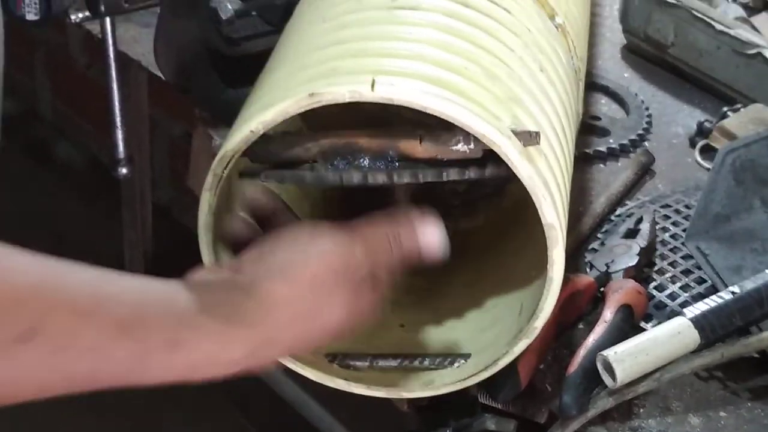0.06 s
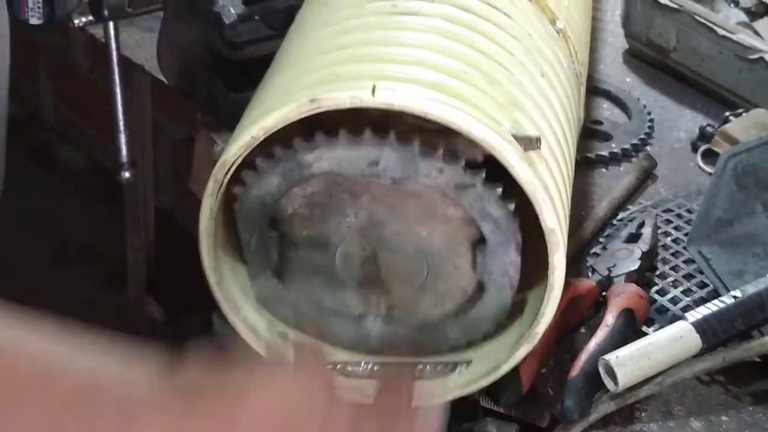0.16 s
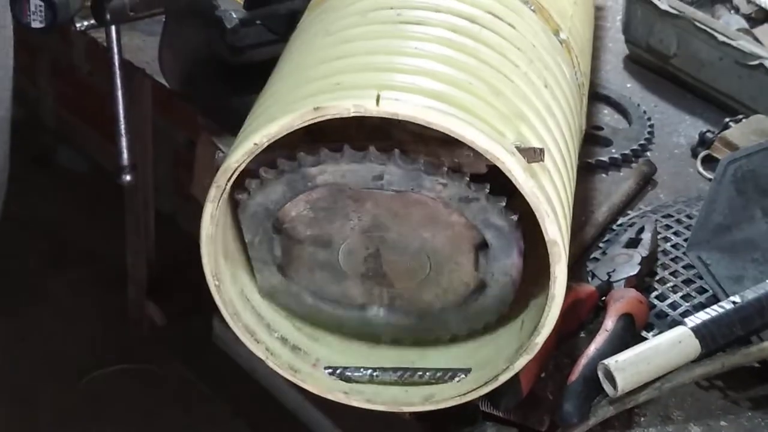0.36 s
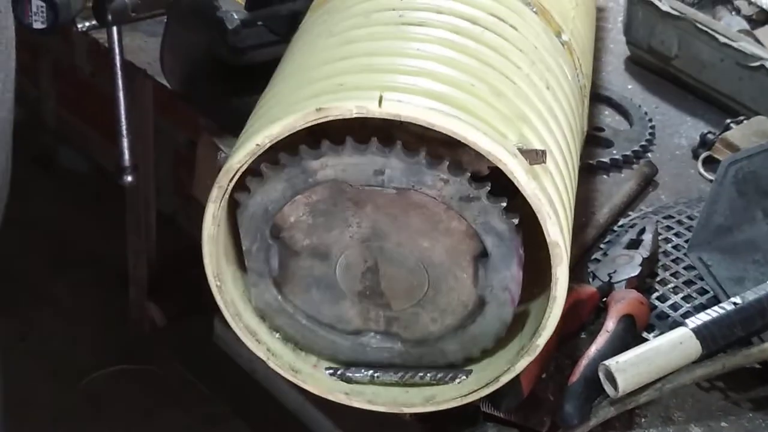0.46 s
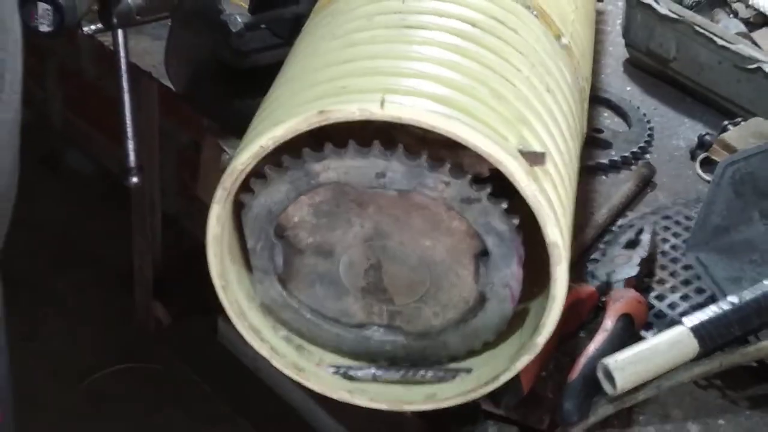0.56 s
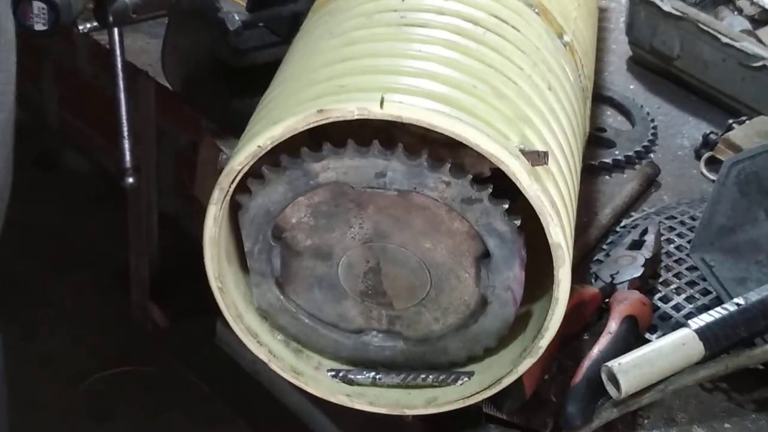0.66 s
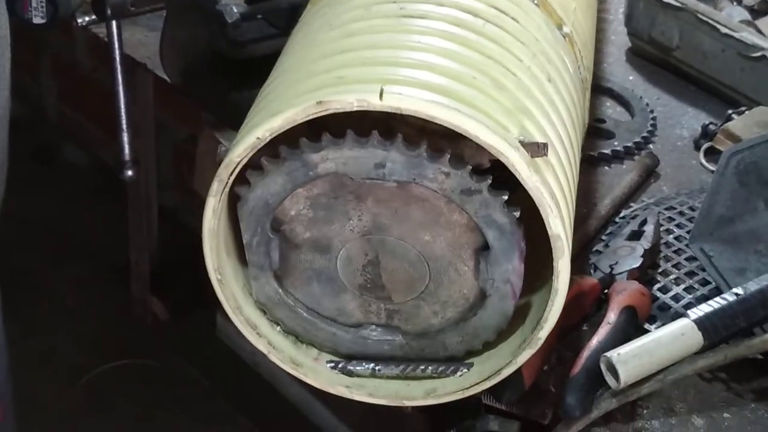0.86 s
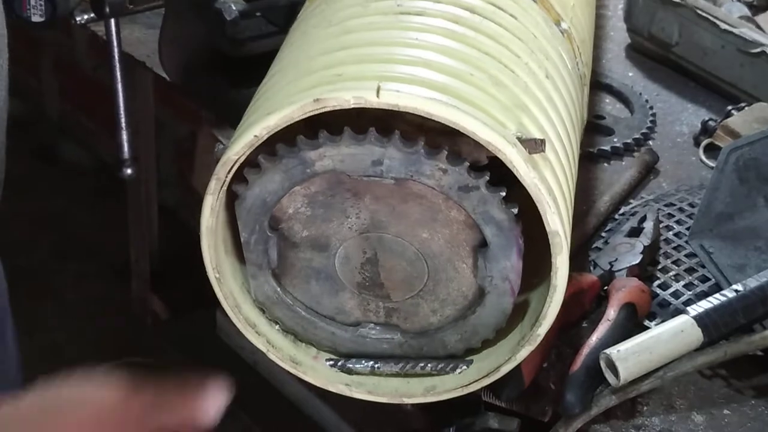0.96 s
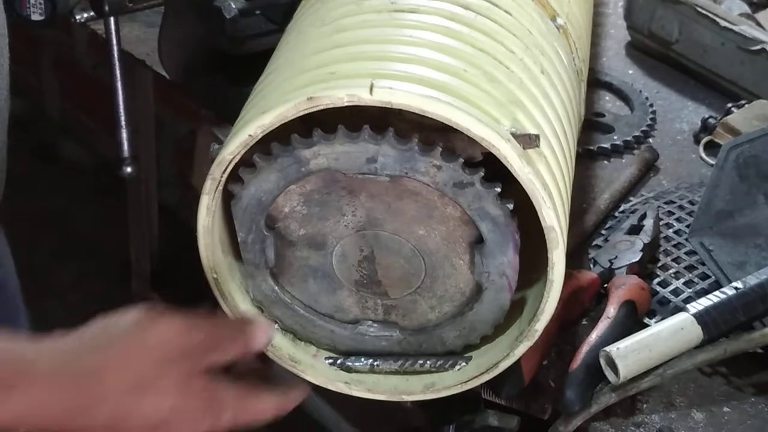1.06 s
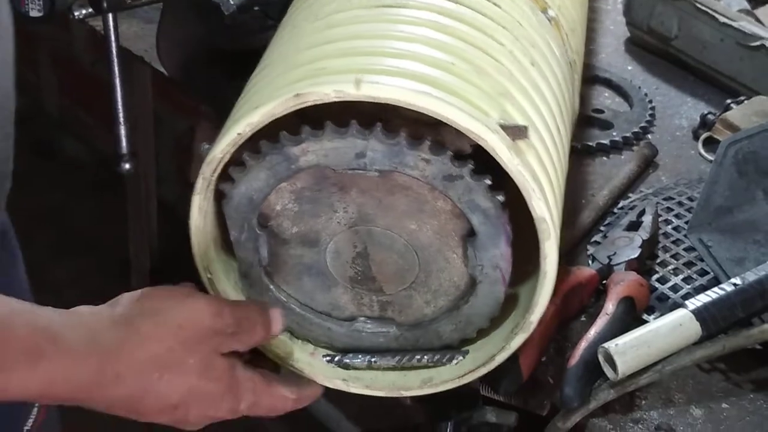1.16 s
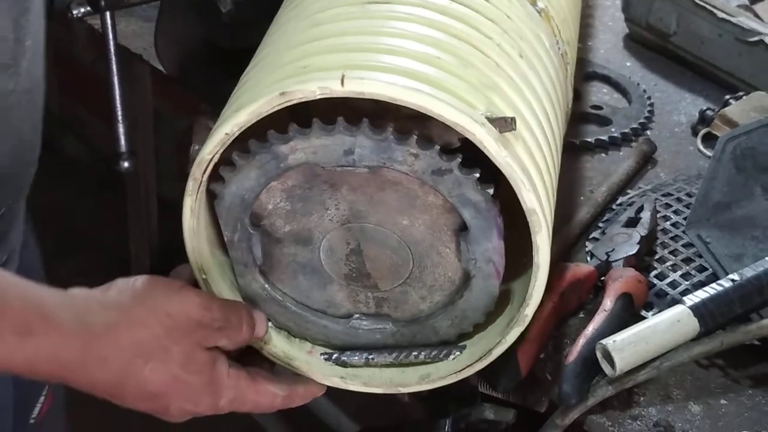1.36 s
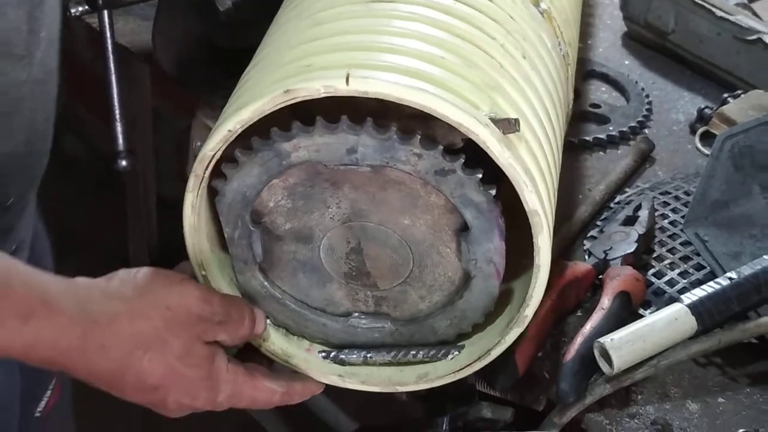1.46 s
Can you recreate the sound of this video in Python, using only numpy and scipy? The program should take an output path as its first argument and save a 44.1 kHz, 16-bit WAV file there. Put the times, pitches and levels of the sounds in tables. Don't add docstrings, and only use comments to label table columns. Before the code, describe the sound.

A heavy steel flap in a plastic pipe is released by hand, slams with a loud bright clank, bounces twice more quietly, then cloth rustles and a hand softly thumps the pipe; close stereo, small workshop.

```python
import sys
import numpy as np
from scipy import signal
from scipy.fft import rfft, irfft, next_fast_len
from scipy.io import wavfile
from scipy.ndimage import map_coordinates

SR = 44100
rng = np.random.default_rng(int(sys.argv[2]) if len(sys.argv) > 2 else 0)


def volts(x):
    e = np.asarray(x, float) / 20
    return 10 ** e


def to_wav(s):
    ch = np.atleast_2d(s).T
    pcm = np.round(np.clip(ch, -1, 1) * 32767)
    wavfile.write(sys.argv[1], SR, pcm.astype(np.int16))


N = 66150
ATTACK_S = 0.00035

# (frequency [Hz], likeness [0-1])
WIDE = [(200, 1), (600, .6), (2000, 0.13), (8000, 0.9)]


def unit(x):
    return x / np.sqrt(np.mean(x ** 2) + 1e-20)


def along(points, hz):
    f, v = np.transpose(points)
    return np.interp(np.log(hz + 1), np.log(f + 1), v)


def filtered(x, response):
    n = x.shape[-1]
    m = next_fast_len(n + 8192)
    return irfft(rfft(x, m) * response(np.fft.rfftfreq(m, 1 / SR)), m)[..., :n]


def rush(n, spectrum, alike):
    def mid_side(hz):
        turn = np.arccos(np.clip(along(alike, hz), -1, 1)) / 2
        return volts(along(spectrum, hz)) * np.array([np.cos(turn), np.sin(turn)])

    mid, side = filtered(rng.standard_normal((2, n)), mid_side)
    return unit(np.array([mid + side, mid - side]))


def wobble(rate):
    knots = rng.standard_normal(int(N * rate / SR) + 4)
    return map_coordinates(knots, [np.arange(N) * rate / SR])


def ring(modes, t, attack, cycles=0):
    phase_scatter = .4
    out, ears = 0, np.array([[1], [-1]])
    for hz, db, t60 in modes:
        level_db, turn = rng.normal(0, 1, 2) * (1 - along(WIDE, hz))
        rise = 1 - np.exp(-t / (attack + cycles / hz))
        fall = volts(db + 2 * level_db * ears - 60 * t / t60)
        out = out + rise * fall * np.sin(2 * np.pi * hz * t + phase_scatter * turn * ears)
    return out


def rustle(curve, spectrum, rough_db, alike):
    s, db = np.transpose(curve)
    times = np.r_[s[0] - .08, s, s[-1] + .06]
    level = np.interp(np.arange(N) / SR, times, np.r_[-95, db, -95])
    flutter = rough_db * (wobble(57) + wobble(380))
    return volts(level + flutter) * rush(N, spectrum, [(300, alike)])


def room_tone():
    # (frequency [Hz], level [dB per Hz])
    air = [(15, -1.5), (80, 0), (110, -6), (400, -12), (1500, -19), (4500, -28.5), (8000, -27.5),
           (13000, -44)]
    return volts(-60.5) * rush(N, air, [(80, 0.15), (200, 0.3), (1000, 0.1), (8000, 0.12)])


def hand():
    # (time [s], level [dB])
    palm = [
        (0.0, -55.5),
        (0.06, -62.5),
        (0.084, -74),
        (0.14, -52),
        (0.182, -63),
        (0.184, -45),
    ]
    # (frequency [Hz], level [dB per Hz])
    skin = [(80, -32.5), (150, -4.5), (400, -10), (1200, -15.5), (2800, -21.5), (4000, -33), (8000, -46),
            (14000, -47)]
    return rustle(palm, skin, rough_db=1.5, alike=1.0)


def grit():
    out, t = np.zeros((2, N + SR)), np.arange(SR // 2) / SR
    # (time [s], frequency [Hz], level [dB])
    ticks = [
        (.045, 11000, -67),
        (.07, 7630, -59),
        (1.237, 7720, -54),
    ]
    for s, hz, db in ticks:
        out[:, round(s * SR):][:, :len(t)] += ring([(hz, db, .02)], t, attack=0.0002)
    return out[:, :N]


def full_face(t):
    rattle_db, rattle_s = -1.5, .0058
    # (frequency [Hz], level [dB], t60 [s])
    face_modes = [(135, -27, .1), (187, -36, .5), (240, -20, .1), (308, -25, .12), (482, -9, .07),
                  (550, -19, .12), (1110, -10, .06), (1196, -8, .1), (1290, -11, .07), (1960, -8, .05),
                  (2380, -9, .045), (6600, -8, .035), (8000, -6, .022), (8380, -2, .03)]
    face = ring(face_modes, t, ATTACK_S, 1)
    again = ring(face_modes[-5:], t, ATTACK_S)
    again = np.pad(again, ((0, 0), (round(rattle_s * SR), 0)))[:, :len(t)]
    return face + volts(rattle_db) * again


def edge(t, light):
    # (frequency [Hz], level [dB], t60 [s])
    bounce_modes = [(680, -18, .13), (770, -16, .12), (1142, -4, .09), (1262, -8, .06), (1570, -4, .08),
                    (1994, -7, .06), (2486, -13, .04), (3930, -10, .025), (5540, -19, .15),
                    (5830, -6, .022), (6130, -6, .025), (6900, -9, .03), (9570, -8, .025),
                    (11060, -8, .022)]
    # (frequency [Hz], level [dB], t60 [s])
    tap_modes = [(663, -17, .2), (1096, -13, .05), (1146, -11, .08), (1434, -14, .12), (1570, -7, .09),
                 (1980, -9, .04), (2312, -17, .09), (3930, -10, .025), (5100, -15, .14), (6700, -12, .04),
                 (7000, -12, .06), (9780, -15, .05), (10575, -11, .07)]
    return ring(tap_modes if light else bounce_modes, t, ATTACK_S, cycles=3)


def clatter(t, share):
    crack_db, crack_t60_s = -11, .03
    clatter_db, clatter_t60_s = -15.5, 0.13
    edge_db = -1.5
    # (frequency [Hz], level [dB per Hz])
    face_spectrum = [(90, -42.5), (300, -5.5), (850, -14.5), (1200, -14), (2400, -5.5), (4500, -16),
                     (7000, -7.5), (14000, -23)]
    # (frequency [Hz], level [dB per Hz])
    edge_spectrum = [(120, -40.5), (250, -15), (520, -24), (900, -10), (3000, -14.5), (6200, -15.5),
                     (11000, -15.5), (13500, -26.5)]
    dense = share * rush(len(t), face_spectrum, WIDE)
    dense = dense + (1 - share) * volts(edge_db) * rush(len(t), edge_spectrum, WIDE)
    fall = volts(crack_db - 60 * t / crack_t60_s) + volts(clatter_db - 60 * t / clatter_t60_s)
    return dense * fall * (1 - np.exp(-t / ATTACK_S))


def linger(t, share, until_next):
    pressed = 0.68
    swell_s, catch_s = .025, .012
    # (frequency [Hz], level [dB], t60 [s])
    free_modes = [(393, -30, 1.4), (415, -40, .3), (700, -35, .4), (1136, -28, .6), (1195, -28, .3),
                  (1630, -32, .28), (6520, -34, .25)]
    held = [(hz, db, t60 * (1 - pressed * share)) for hz, db, t60 in free_modes]
    return ring(held, t, swell_s) * np.exp(-np.clip(t - until_next, 0, None) / catch_s)


def shop(x):
    delay_s = .006
    # (frequency [Hz], t60 [s])
    decay = [(150, .4), (500, 0.41), (2000, .3), (6000, 0.28), (13000, .22)]
    hz, t, z = signal.stft(rush(x.shape[1], [(100, 0)], WIDE), SR, nperseg=256)
    tail = signal.istft(z * volts(-60 * t / along(decay, hz)[:, None]), SR, nperseg=256)[1]
    tail = np.pad(tail, ((0, 0), (round(delay_s * SR), 0))) / np.linalg.norm(tail[0])
    return signal.fftconvolve(x[:1], tail, axes=1)[:, :x.shape[1]]


def off_axis(x):
    # (frequency [Hz], left over right [dB])
    port_db = [(180, 4.5), (1000, -2.5), (2500, 2.5), (5000, 2), (9000, 3.5), (13000, 2)]
    # (frequency [Hz], left leads by [rad])
    port_turn = [(200, 0.04), (1000, 0.2), (3000, 1.3), (5000, 1.8), (9000, 0.79), (13000, 0.99)]
    ears = np.array([[.5], [-.5]])
    return filtered(x, lambda f: volts(ears * along(port_db, f)) * np.exp(1j * ears * along(port_turn, f)))


def flap():
    modes_db, room_db = -6, -3.5
    low_hz, light_db = 140, -25
    # (time [s], peak [dB], full-face share [0-1], lingering ring [dB], brightness limit [Hz])
    hits = [
        (.188, -31, 0, -4, 7200),
        (.247, 3.5, 1, -5.5, 13780),
        (.553, -10.5, 0.25, -6, 12200),
        (.836, -26, 0.23, -10, 11100),
        (1.363, -37.5, 0.44, -4, 6700),
    ]
    out, t = np.zeros((2, N + SR)), np.arange(int(.7 * SR)) / SR
    next_times = [hit[0] for hit in hits[1:]] + [9]
    for (s, db, share, linger_db, top_hz), then in zip(hits, next_times):
        share = np.clip(share, 0, 1)
        body = share * full_face(t) + (1 - share) * edge(t, db < light_db)
        body = volts(modes_db) * body
        noise = clatter(t, share)
        free = volts(linger_db) * linger(t, share, then - s)
        hit = body + noise + volts(room_db) * shop(noise + 0.55 * body) + free

        def brightness(f):
            low_cut = (1j * f / (low_hz + 1j * f)) ** 2
            return low_cut / (1 + 1.2j * f / top_hz - (f / top_hz) ** 2) ** 2

        out[:, round((s - .0005) * SR):][:, :len(t)] += volts(db) * filtered(hit, brightness)
    return off_axis(out[:, :N])


def sleeve():
    # (time [s], level [dB])
    rub = [
        (1.0, -100),
        (1.06, -83.5),
        (1.24, -62),
        (1.292, -65),
        (1.356, -60.5),
        (1.364, -58.5),
        (1.39, -64),
        (1.5, -61.5),
    ]
    # (frequency [Hz], level [dB per Hz])
    cloth = [(300, -29.5), (1500, -10.5), (2500, -7), (4500, -16.5), (7800, -8), (10000, -15), (12000, -25),
             (14200, -32.5)]
    return rustle(rub, cloth, rough_db=0.86, alike=0.3)


def thump():
    thump_s = 1.362
    # (frequency [Hz], level [dB], t60 [s])
    pipe_modes = [(60.9, -49, 0.52), (47.7, -54, .8), (92.1, -71, 0.56), (138, -53.5, 0.16),
                  (263, -60.5, .2)]
    out, t = np.zeros((2, N + SR)), np.arange(SR // 2) / SR
    boom = ring(pipe_modes, t, attack=0.0082) * volts([[2], [-3]])
    out[:, round(thump_s * SR):][:, :len(t)] += boom
    return out[:, :N]


def scene():
    return room_tone() + hand() + grit() + flap() + sleeve() + thump()


def band_limit(x):
    return signal.sosfilt(signal.butter(12, 14280, fs=SR, output="sos"), x)


def record(dry):
    top, hardness = 1.1, 8
    mix = dry / (1 + np.abs(dry / top) ** hardness) ** (1 / hardness)
    return band_limit(mix)


dry = scene()
out = record(dry)
to_wav(out)
```